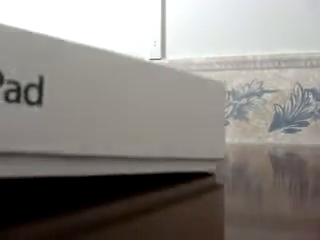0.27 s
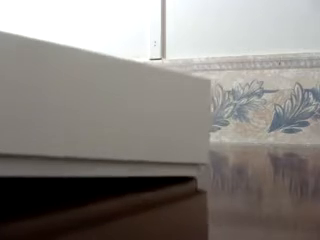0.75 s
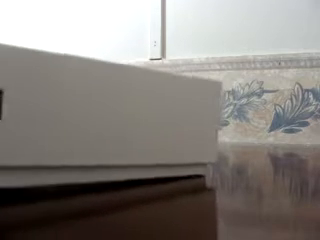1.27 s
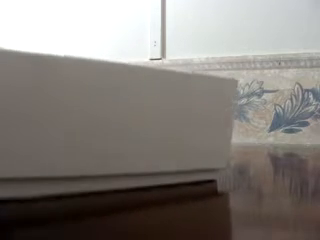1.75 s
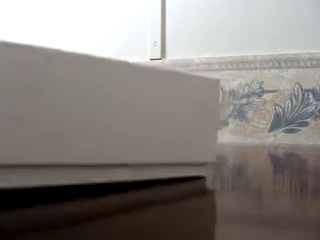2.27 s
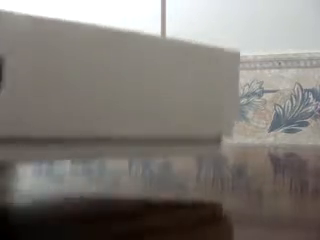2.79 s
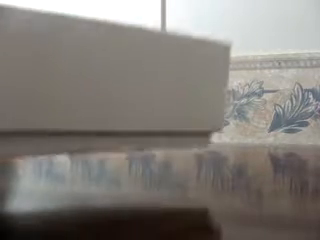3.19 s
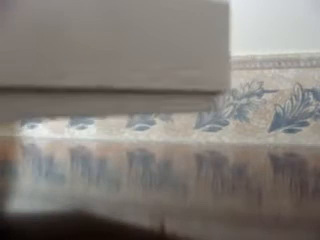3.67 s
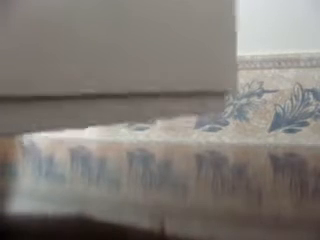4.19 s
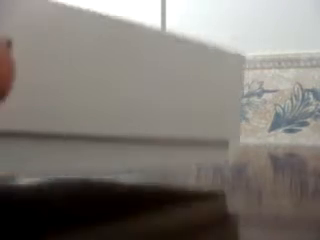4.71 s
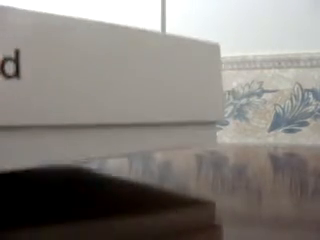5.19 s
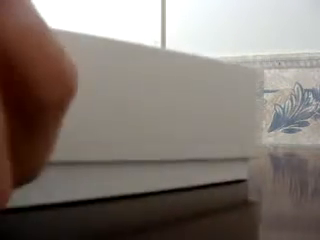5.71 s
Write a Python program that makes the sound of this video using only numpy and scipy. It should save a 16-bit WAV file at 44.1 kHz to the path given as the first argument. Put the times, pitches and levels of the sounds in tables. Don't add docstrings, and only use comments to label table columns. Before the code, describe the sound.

Close, slightly overloaded small microphone in a quiet room. A hollow cardboard box bumps on a table, then its tight lid rasps and hisses in short slides. One sharp bump follows, then more rubbing. Vigorous shaking makes contents knock rapidly against the panels. It stops abruptly; the box is set down, scraped and dropped hard, ending with skin rubbing card.

```python
import sys
import numpy as np
from scipy import signal
from scipy.fft import rfft, irfft, next_fast_len
from scipy.io import wavfile

SR = 44100
rng = np.random.default_rng(int(sys.argv[2]) if len(sys.argv) > 2 else 0)


def elevation(decibels):
    levels = np.asarray(decibels, float)
    return 10 ** (levels / 20)


def bounce(signal):
    frames = np.transpose(np.atleast_2d(signal))
    limited = np.clip(frames, -1, 1)
    pcm = np.round(limited * 32767).astype(np.int16)
    wavfile.write(sys.argv[1], SR, pcm)


N = 262326

# (frequency [Hz], level [dB], t60 [s])
DEEP_MODES = [(259.5, -2, 0.12), (312, -5, 0.038), (355.6, -1, 0.079)]
LID_MODES = [(370, -3, 0.063), (456, 5.5, 0.039)]
WALL_MODES = [(573.2, 12, 0.035), (666.3, 7, 0.038), (781, -3, 0.07), (876, -1, 0.056)]
CARD_MODES = [(1130, 9, 0.023), (1170, 5.5, 0.035), (1355, 10, 0.031), (1730, -0.5, 0.049),
              (2097, 0.5, 0.045), (2365, 0, 0.026), (3097, -23.5, 0.041)]
# (time [s], peak [dB], deep panels [dB], side walls [dB], crack [dB])
BUMPS = [
    (0.196, -5, -4.5, -15.5, -12),
    (0.206, -20, 11.5, -1.5, 0.5),
    (0.236, -7.5, 3.5, -5.5, -7.5),
    (0.482, -5, 2, -8.5, -6),
    (1.7395, -2.5, -2, -5.5, -16.5),
    (5.046, -1.5, 3, -9.5, -10),
    (5.572, 6.5, -10.5, -19, -12.5),
]


def rms_one(x):
    return x / np.sqrt(np.mean(x ** 2) + 1e-20)


def band(x, order, low_hz, high_hz):
    return signal.sosfilt(signal.butter(order, [low_hz, high_hz], "band", fs=SR, output="sos"), x)


def in_time(curve):
    s, level_db = np.transpose(curve)
    return np.interp(np.arange(N) / SR, s, level_db)


def drift(rate_hz):
    hop, settle = 40, 2000
    r = np.exp(-2 * np.pi * rate_hz * hop / SR)
    noise = rng.standard_normal(N // hop + 2 + settle)
    slow = signal.lfilter([1], [1, -2 * r, r * r], noise)[settle:]
    return np.interp(np.arange(N) / hop, np.arange(len(slow)), rms_one(slow))


def coloured(x, spectrum):
    bin_hz = np.maximum(np.arange(N // 2 + 1) * SR / N, 1)
    hz, level_db = np.transpose(spectrum)
    gain = elevation(np.interp(np.log(bin_hz), np.log(hz), level_db))
    return rms_one(irfft(rfft(x) * gain, N))


def ring(clicks, hz, t60_s):
    r, w = elevation(-60 / (t60_s * SR)), 2 * np.pi * hz / SR
    return signal.lfilter([0, np.sin(w)], [1, -2 * r * np.cos(w), r * r], clicks + 1e-18)


def fibres(per_s, spread_db):
    sizes = elevation(spread_db * np.minimum(rng.exponential(1, N), 5)) * rng.choice([-1, 1], N)
    return sizes * (rng.random(N) < per_s / SR)


def fibres_ring(modes, offset_db, spread_db):
    return sum(elevation(mode_db + offset_db) * ring(fibres(900, spread_db), hz, t60_s)
               for hz, mode_db, t60_s in modes)


def strokes(s, rise_s, fall_s, level_db):
    edge_db, hop = 12, 20
    t = np.arange(0, N, hop)[:, None] / SR - s
    phase = np.where(t < 0, t / rise_s, t / fall_s)
    each = elevation(level_db - edge_db * np.minimum(phase ** 2, 9))
    gain = np.sqrt(np.sum(each ** 2, axis=1))
    return np.interp(np.arange(N), np.arange(0, N, hop), gain)


def struck(times_s, level_db, modes, low_hz, soft_hz):
    scatter_db = 2
    at, out = np.round(times_s * SR).astype(int), np.zeros(N)
    chance = rng.standard_normal((len(at), len(modes)))
    for k, (hz, mode_db, t60_s) in enumerate(modes):
        clicks = np.zeros(N)
        clicks[at] = -elevation(level_db + mode_db + scatter_db * chance[:, k])
        out += ring(clicks, hz, t60_s)
    return band(out, 3, low_hz, soft_hz)


def puff(times_s, level_db, t60_s):
    starts = np.zeros(N)
    starts[np.round(times_s * SR).astype(int)] = elevation(level_db)
    decay = signal.lfilter([1], [1, -elevation(-60 / (t60_s * SR))], starts + 1e-18)
    return rng.standard_normal(N) * decay


def room_tone():
    # (frequency [Hz], density [dB per Hz])
    tone_spectrum = [(15, -35), (25, -24), (107, -15), (172, -7.5), (546, 2.5), (795, 0), (1420, -2),
                     (1820, -8), (2060, -1), (2340, -7.5), (8180, -15), (10000, -14), (13000, -49),
                     (22000, -120)]
    return elevation(-45.5) * coloured(rng.standard_normal(N), tone_spectrum) * elevation(0.27 * drift(17))


def room(x):
    t60_s, wall_cut_hz = 0.17, 11000
    size = next_fast_len(N + SR)
    turn = np.exp(-2j * np.pi * np.arange(size // 2 + 1) / size)
    dull = np.exp(-2 * np.pi * wall_cut_hz / SR)
    echoes = 0
    for k, lag in enumerate((rng.uniform(0.013, 0.029, 8) * SR).astype(int)):
        loop = elevation(-60 * lag / SR / t60_s) * (1 - dull) / (1 - dull * turn) * turn ** lag
        echoes = echoes + (-1) ** k * loop / (1 - loop)
    return irfft(rfft(x, size) * echoes, size)[:N]


def push():
    # (time [s], level [dB])
    flexing = [(0.0, -64), (0.3, -56), (0.45, -57), (1.3, -66), (1.9, -45.5), (2.4, -67), (3.35, -62.5),
               (3.55, -41.5), (3.94, -76.5), (4.25, -42), (4.4, -37), (4.64, -53), (4.78, -81.5),
               (5.15, -79), (5.42, -42), (5.65, -38.5), (5.95, -66)]
    lumps = band(fibres(400, spread_db=2.5), 2, 40, 130)
    return rms_one(lumps) * elevation(in_time(flexing))


def rasp_source():
    # (frequency [Hz], density [dB per Hz])
    rasp_spectrum = [(500, -26), (900, 5.5), (1400, 5.5), (2400, 2.5), (3200, 2.5), (4500, -30)]
    papery = np.zeros(N)
    for hz, _, t60_s in CARD_MODES:
        papery += elevation(7.8 * drift(3.4)) * ring(fibres(1300, spread_db=3.0), hz, 0.12 * t60_s)
    broad = coloured(fibres(5000, spread_db=4.5), rasp_spectrum)
    return rms_one(broad + elevation(-6.5) * rms_one(np.diff(papery, prepend=0)))


def hiss_source():
    # (frequency [Hz], density [dB per Hz])
    hiss_spectrum = [(2000, -24), (3500, -5), (5000, -2.5), (6500, -2.5), (8000, -7), (10000, -9)]
    hiss = coloured(fibres(9000, spread_db=3.0), hiss_spectrum)
    for hz in (3000, 4700, 6300):
        hiss = hiss + elevation(-17 + 4.5 * drift(14)) * rms_one(ring(hiss, hz, t60_s=0.004))
    return hiss


def rubbing():
    # (time [s], rise [s], fall [s], rasp [dB], skin hiss above rasp [dB])
    rubs = [(0.024, 0.018, 0.042, -51, -7), (0.103, 0.0059, 0.0092, -44, -24),
            (.36, 0.081, 0.014, -42, -13), (.73, 0.16, 0.056, -43, -1), (.864, 0.028, 0.075, -39, -3.5),
            (1.07, 0.062, 0.063, -39.5, -2), (1.121, 0.045, 0.031, -35.5, -8),
            (1.224, .05, 0.042, -34.5, -4.5), (1.82, 0.11, .04, -41, -2), (2.19, 0.021, 0.27, -51.5, -6),
            (2.48, 0.036, 0.036, -39.5, -1), (2.54, 0.031, 0.052, -33, 4), (2.6, 0.037, 0.028, -39.5, -8),
            (2.686, .02, 0.027, -46, -12), (2.766, 0.014, .03, -41.5, -6), (2.85, 0.031, 0.044, -35, -8),
            (2.96, 0.014, 0.13, -44, -5.5), (3.104, 0.027, 0.066, -39, 1.5), (3.36, 0.064, .06, -48, 4.5),
            (4.639, 0.014, 0.055, -28.5, -8), (4.76, 0.032, 0.12, -58, -1),
             (5.022, 0.087, 0.043, -37.5, 5), (5.13, 0.082, 0.23, -47.5, -6), (5.33, 0.061, 0.092, -44, -5),
             (5.44, 0.034, 0.025, -38.5, -5.5), (5.532, 0.053, 0.059, -33, -3),
             (5.645, 0.037, 0.048, -30.5, 4.5), (5.698, 0.046, 0.023, -32, 6),
             (5.844, 0.024, 0.021, -31, 3), (5.948, 0.05, .04, -44, -5)]
    # (time [s], half length [s], lid [dB], deep panels above lid [dB])
    drags = [(0.323, .1, -40.5, 0.5), (0.553, 0.088, -43, -2.5), (0.742, 0.014, -44, -10),
             (0.874, 0.033, -44, -7), (1.058, 0.018, -49.5, 3), (1.268, 0.026, -43, -2),
             (1.433, 0.067, -53.5, 9), (1.815, 0.024, -40.5, 4), (1.879, 0.042, -44.5, -10),
             (2.159, 0.04, -45.5, -8.5), (2.445, 0.11, -45, -12), (2.695, 0.019, -45, -19),
             (2.76, 0.017, -48, 3), (2.86, 0.098, -43.5, -7), (3.098, 0.059, -35.5, -27),
             (3.388, 0.029, -32.5, -13), (4.665, 0.051, -40, -11), (4.774, 0.052, -41, -1),
             (4.96, .1, -46, -3), (5.106, 0.019, -31, 0), (5.237, 0.18, -40.5, -1),
             (5.458, 0.038, -38.5, 2), (5.538, 0.044, -33.5, 0), (5.6, 0.094, -29.5, -1.5),
             (5.847, 0.071, -37, -9.5), (5.94, 0.027, -42.5, -0.5)]
    # (time [s], level [dB])
    effort = [
        (3.4, -94),
        (3.53, -47),
        (3.9, -47.5),
        (4.15, -49.5),
        (4.33, -42.5),
        (4.5, -39),
        (4.58, -64),
        (4.62, -63),
    ]
    s, rise_s, fall_s, rasp_db, skin_db = np.transpose(rubs)
    drag_s, half_s, drag_db, deep_db = np.transpose(drags)
    shake = elevation(in_time(effort))

    rasp_gain = elevation(-59) + strokes(s, rise_s, fall_s, rasp_db) + shake
    hiss_gain = elevation(-53) + strokes(s, rise_s, fall_s, rasp_db + skin_db) + shake * elevation(-7.5)
    rumble_gain = elevation(-68) + strokes(drag_s, half_s, half_s, drag_db) + shake * elevation(8)
    boom_gain = elevation(-68) + strokes(drag_s, half_s, half_s, drag_db + deep_db) + shake * elevation(-9.5)

    rumble = fibres_ring(LID_MODES, 0, spread_db=0.0) + fibres_ring(WALL_MODES, -10, spread_db=2.5)
    boom = fibres_ring(DEEP_MODES, 0, spread_db=0.0)
    surface = rasp_source() * rasp_gain + hiss_source() * hiss_gain
    hollow = rms_one(rumble) * rumble_gain + rms_one(boom) * boom_gain
    grip_db = 1.4 * drift(60)
    return surface * elevation(grip_db) + hollow * elevation(2.6 * drift(42))


def ticks():
    # (time [s], peak [dB], centre [Hz], crack
    # [dB])
    sharp_rings = [(0.345, -19, 1070, -12), (0.3744, -15, 1290, -22), (0.9638, -18, 2950, -31),
                   (1.7389, 2, 1280, -40), (1.7404, -5, 1030, -40), (2.4386, -29.5, 1140, 3.5),
                   (2.5354, -11, 2840, -1.5), (2.5742, -13, 2940, -24), (2.763, -22.5, 1410, -20),
                   (3.895, -14, 1330, -22), (4.6229, -6, 1300, -34), (4.6269, -3.5, 1390, -9.5),
                   (5.0994, -8.5, 1200, -2), (5.4533, -10.5, 1110, -24), (5.5451, -1, 2320, -29),
                   (5.646, -6.5, 6000, -17), (5.71, -9, 1350, -19)]
    out, length = np.zeros(N), 2000
    for s, peak_db, hz, crack_db in sharp_rings:
        i = round((s + 0.001) * SR)
        burst = puff(np.array([s + 0.0012]), peak_db, t60_s=0.009)[i:i + length]
        burst[0] = elevation(peak_db + 13)
        slope = np.diff(ring(burst, hz, t60_s=0.011), prepend=0) * SR / (2 * np.pi * hz)
        crack = band(burst, 1, 2800, 7500)
        out[i:i + length] += elevation(-22) * slope + elevation(crack_db) * crack
    return out


def blows():
    # (time [s], peak [dB], deep panels [dB], hardness [dB])
    rattles = [(3.304, -33, -26, -8), (3.362, -34, -10, -4), (3.403, -20.5, -25, -4.5),
               (3.433, 0.5, -16.5, 0), (3.469, -22, -15, -17), (3.51, -23, -3, -1.5), (3.547, -37, 3, -28),
               (3.603, -11, -6.5, -3), (3.672, -41, 7, -3), (3.706, 0.5, -13, -2),
               (3.803, -15.5, -11.5, 2.5), (3.831, 4, -23.5, 0), (3.912, -3, -10.5, 0.5),
               (3.956, 4.5, -18, 2.5), (3.999, -23, -15, 3.5), (4.039, -8, -34, 4), (4.066, 3, -12, 0.5),
               (4.108, -28.5, -7, 6.5), (4.138, -4.5, -16, -1), (4.181, 4, -14.5, 4), (4.221, -19, -24, 0),
               (4.248, -10.5, -32, 1), (4.292, 2, -9, 4), (4.325, -9, -5, -4), (4.355, -1.5, -20, -1.5),
               (4.404, 2.5, -16.5, 4.5), (4.439, -25, -32, -1), (4.473, -7, -25, 0),
               (4.525, -2, -11.5, -3.5), (4.591, -19.5, -29, -5)]
    # (time [s], peak [dB], deep panels [dB], hardness [dB])
    taps = [(0.096, -45, -27, -12), (0.731, -29, -16, -5), (0.856, -36, -25, -8), (1.387, -33.5, -18, -15),
            (2.096, -33.5, 0, -15), (2.35, -32, 5, -13), (2.515, -21.5, -23.5, -7.5), (2.781, -37, -23, -2),
            (2.838, -22.5, -19, 0), (2.874, -17, -8.5, -10), (2.991, -30, -23, -11), (3.071, -42, -33, -2),
            (4.753, -38, 0, -28), (4.86, -32, 3, -15), (5.252, -37, -24, -22), (5.376, -23, -14, -8),
            (5.45, -20, -26, -11.5)]
    s, peak_db, deep_db, hard_db = np.transpose(rattles + taps)
    wall_db = -11 - 0.59 * peak_db + hard_db
    crack_db = -16.5 - 0.62 * peak_db + hard_db
    loose = [s, peak_db, deep_db, wall_db, crack_db, crack_db - 15]
    landed = np.transpose(BUMPS)
    return np.hstack([np.vstack([landed, landed[-1] - 9.5]), loose])


def knocks():
    # (frequency [Hz], level [dB], t60 [s])
    table_modes = [(57, -7, 0.15), (108.8, -10.5, 0.13), (140.3, -9.5, 0.25)]
    rebound_s, contact_lag_s = 0.0095, 0.00189
    s, peak_db, *parts_db = blows()
    late_s = s + rebound_s * elevation(1.407 * rng.standard_normal(len(s)))
    times_s = np.concatenate([s, late_s]) + contact_lag_s

    rebound_db = -5.0 + 0.054 * peak_db - 0.18 * np.maximum(parts_db[0] + 16.0, 0)
    rebound_db[:len(BUMPS)] -= 4.0
    blow_db = np.concatenate([peak_db, peak_db + rebound_db])
    deep_db, wall_db, crack_db, snap_db = [blow_db + np.tile(part_db, 2) for part_db in parts_db]

    table = struck(times_s, deep_db - 13, table_modes, low_hz=43, soft_hz=249)
    panels = struck(times_s, deep_db - 5, DEEP_MODES, low_hz=205, soft_hz=745)
    lid = struck(times_s, blow_db - 7.5, LID_MODES, low_hz=280, soft_hz=1370)
    walls = struck(times_s, wall_db - 9, WALL_MODES, low_hz=477, soft_hz=2090)
    card = struck(times_s, crack_db - 15.5, CARD_MODES, low_hz=730, soft_hz=5160)
    crunch = band(puff(times_s, crack_db + 2, t60_s=0.029), 2, 700, 2600)
    snap = band(puff(times_s, snap_db + 3.5, t60_s=0.025), 2, 2500, 6500)
    return table + panels + lid + walls + card + crunch + snap


def scene():
    hits = knocks() + ticks()
    return np.array([room_tone() + push() + rubbing() + hits + elevation(-17) * room(hits)])


def roll_off(x):
    return signal.sosfilt(signal.butter(12, 16370, fs=SR, output="sos"), x)


def record(dry):
    # (time [s], starved above [Hz])
    starved = [(.172, 3000), (.248, 5300), (.456, 1000), (1.716, 400), (2.445, 5000), (2.63, 5000),
               (3.808, 3000), (3.855, 5000), (3.935, 3500), (4.16, 3200), (4.27, 3200), (4.383, 3200),
               (4.43, 5200), (4.54, 5000), (4.598, 2500), (5.112, 4800), (5.582, 5500), (5.727, 5500)]
    starved_s, starved_db, clip_level = 0.021, -20, 0.725
    x = signal.sosfilt(signal.cheby2(18, 75, 10700, fs=SR, output="sos"), dry)
    x = signal.sosfilt(signal.butter(2, 70, "high", fs=SR, output="sos"), x)
    for s, above_hz in starved:
        span = slice(round(s * SR), round((s + starved_s) * SR))
        high = signal.butter(6, above_hz, "high", fs=SR, output="sos")
        treble = signal.sosfiltfilt(high, x[:, span])
        x[:, span] -= treble * (1 - elevation(starved_db)) * signal.windows.tukey(treble.shape[1], 0.25)
    return roll_off(np.clip(x, -clip_level, clip_level))


dry = scene()
out = record(dry)
bounce(out)
```